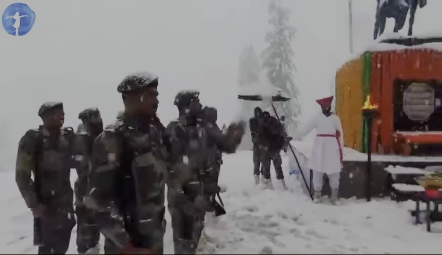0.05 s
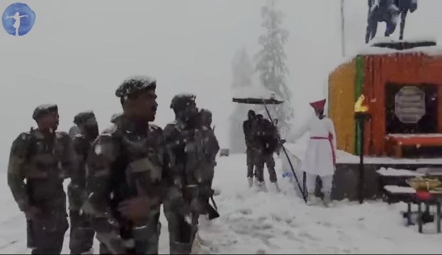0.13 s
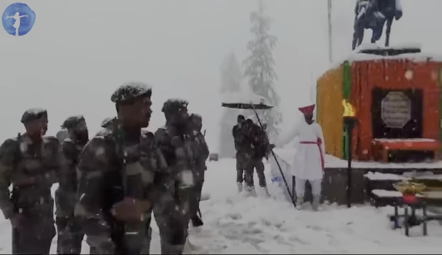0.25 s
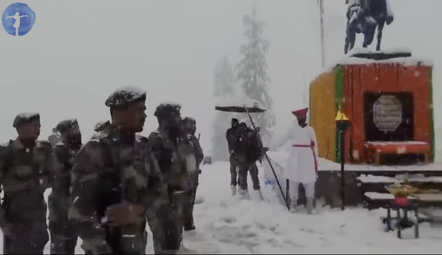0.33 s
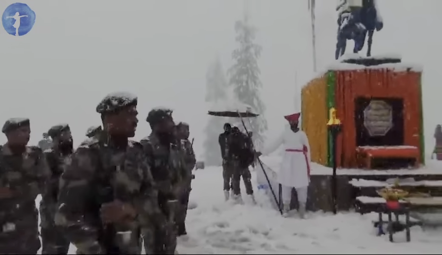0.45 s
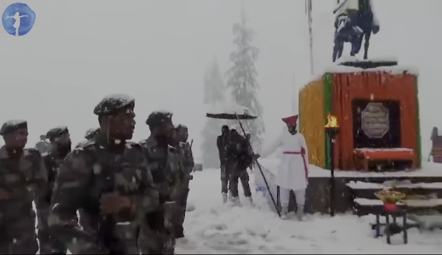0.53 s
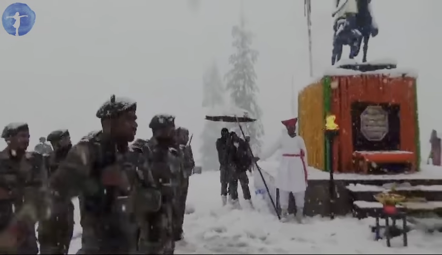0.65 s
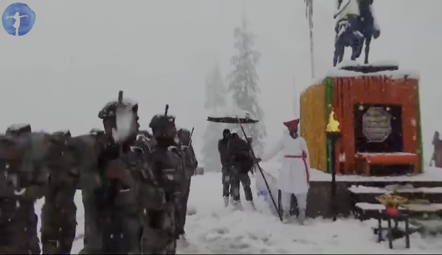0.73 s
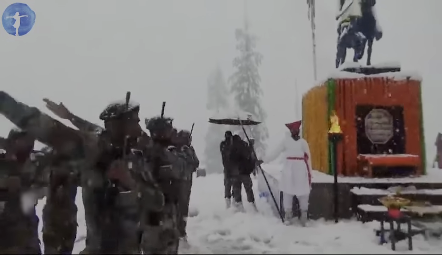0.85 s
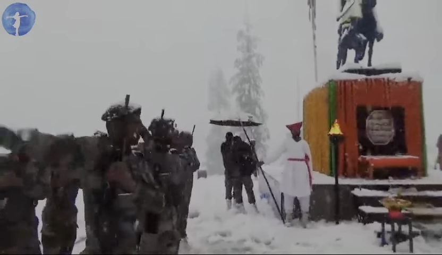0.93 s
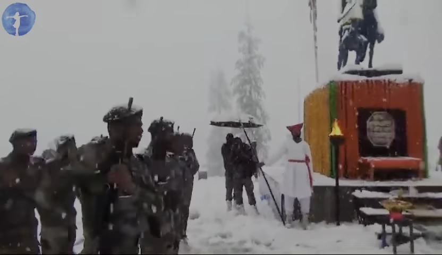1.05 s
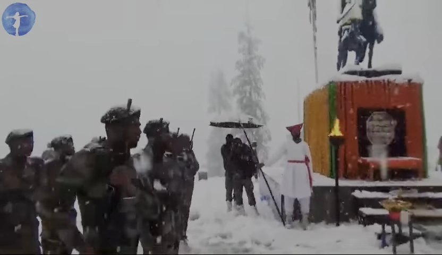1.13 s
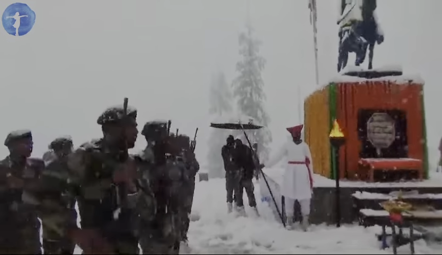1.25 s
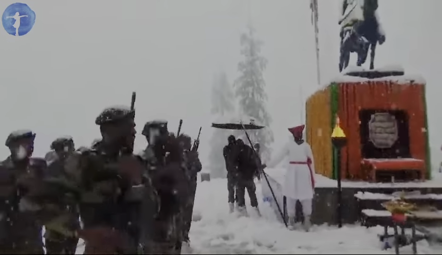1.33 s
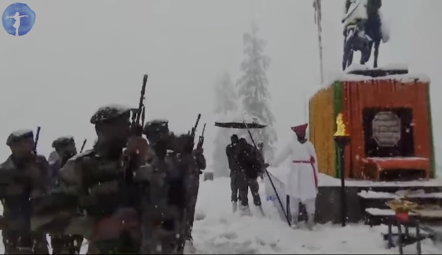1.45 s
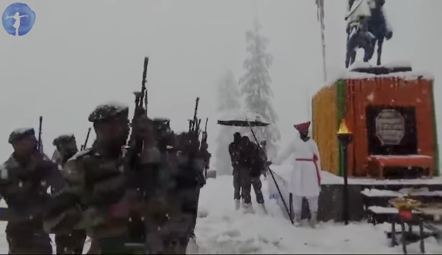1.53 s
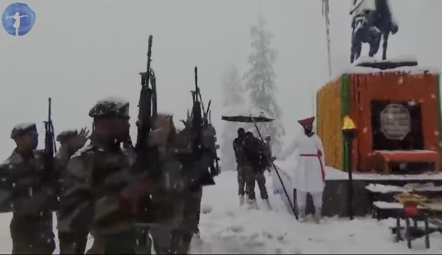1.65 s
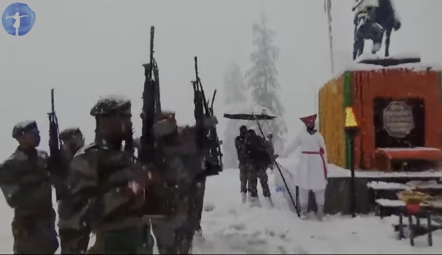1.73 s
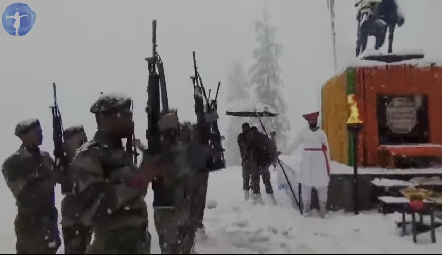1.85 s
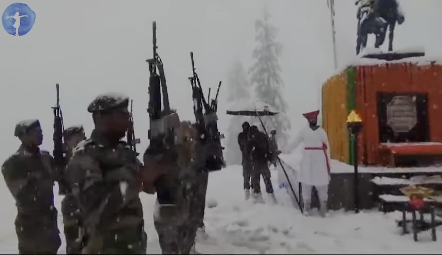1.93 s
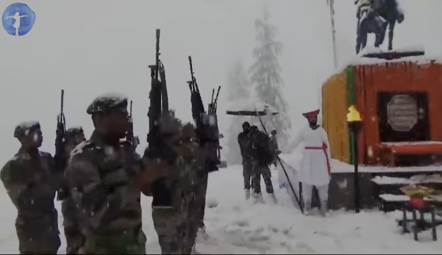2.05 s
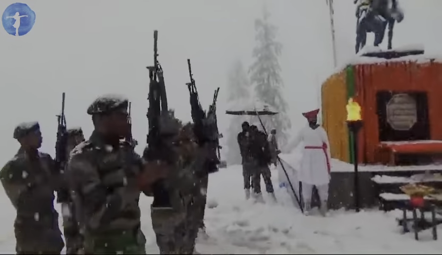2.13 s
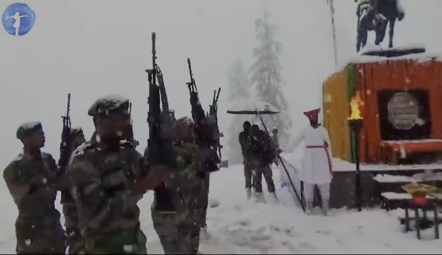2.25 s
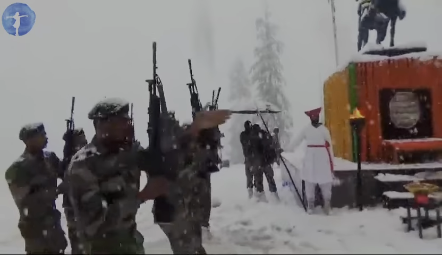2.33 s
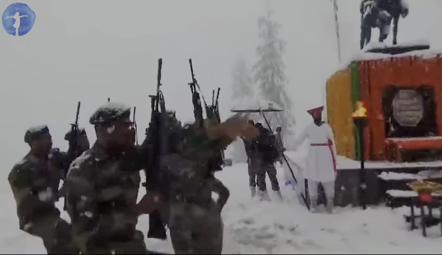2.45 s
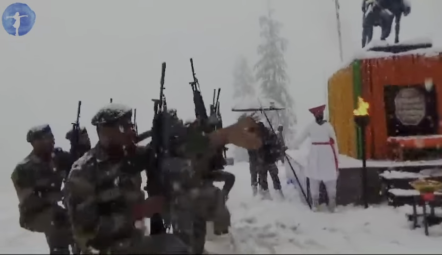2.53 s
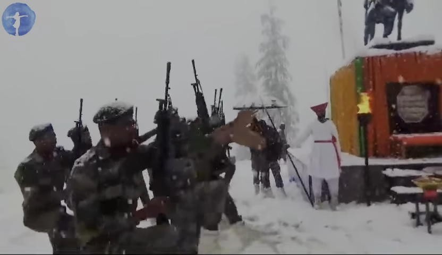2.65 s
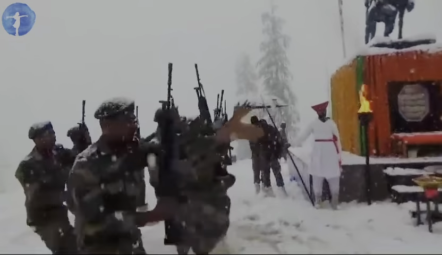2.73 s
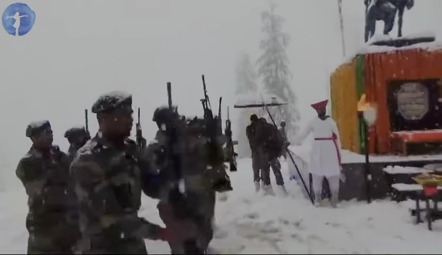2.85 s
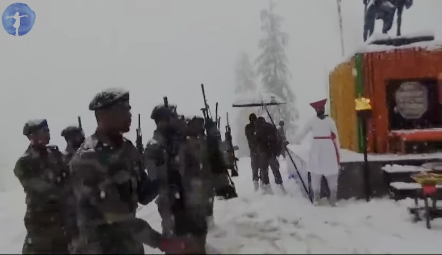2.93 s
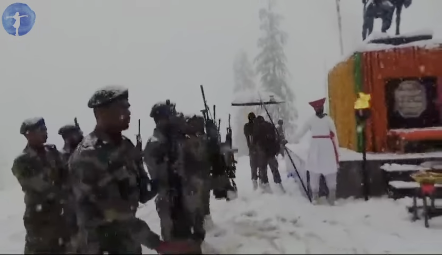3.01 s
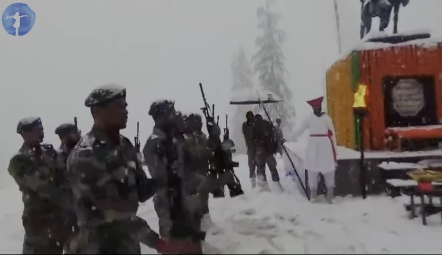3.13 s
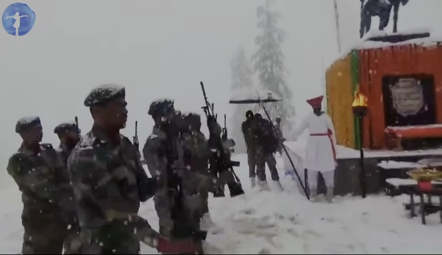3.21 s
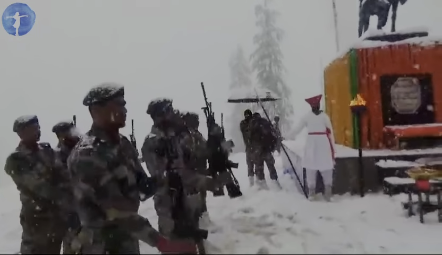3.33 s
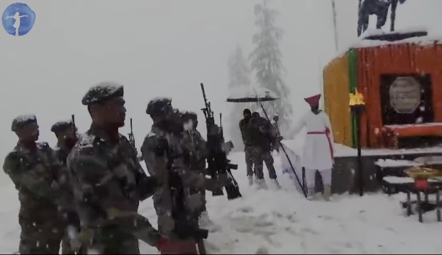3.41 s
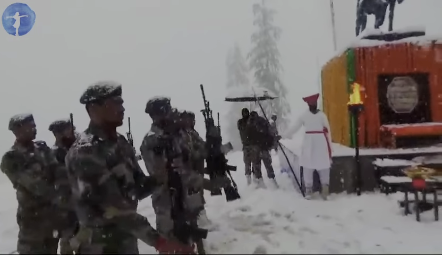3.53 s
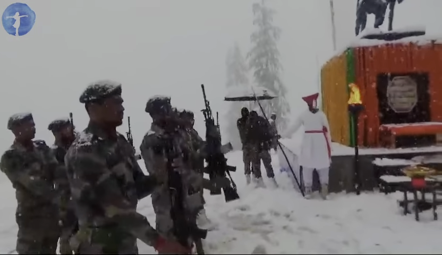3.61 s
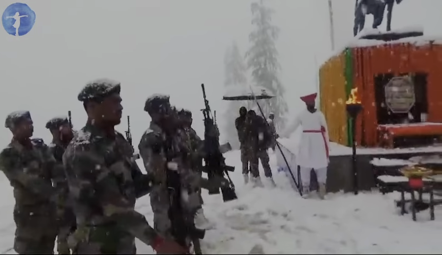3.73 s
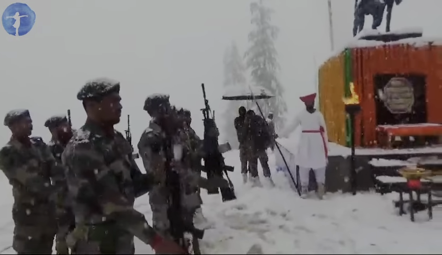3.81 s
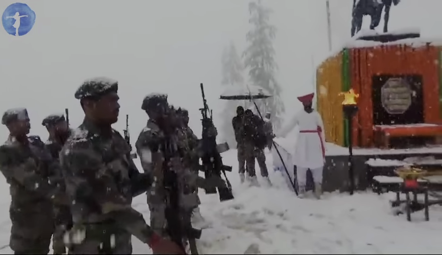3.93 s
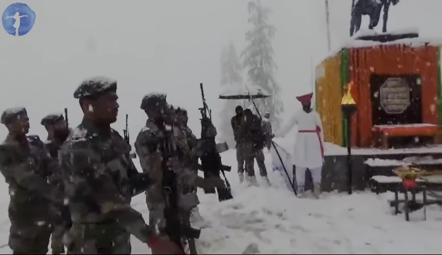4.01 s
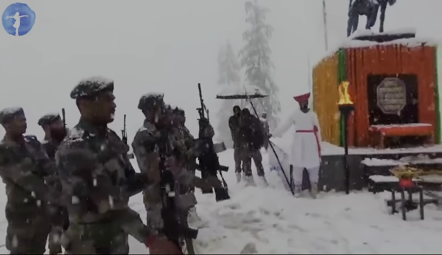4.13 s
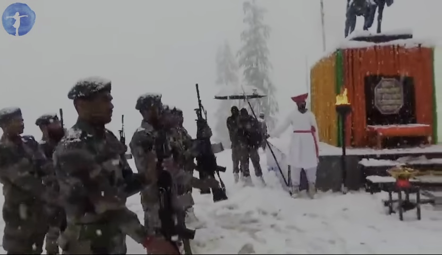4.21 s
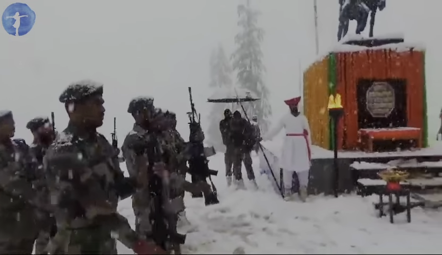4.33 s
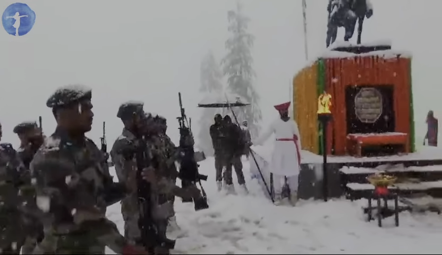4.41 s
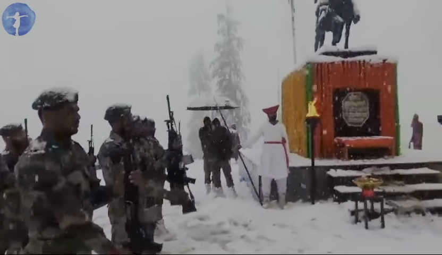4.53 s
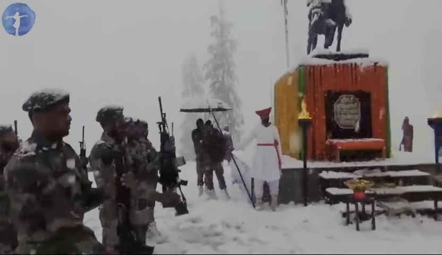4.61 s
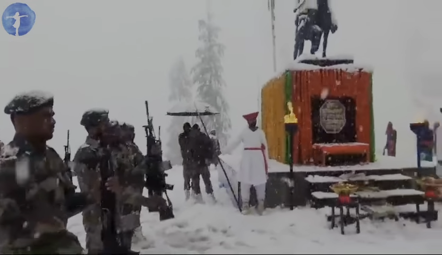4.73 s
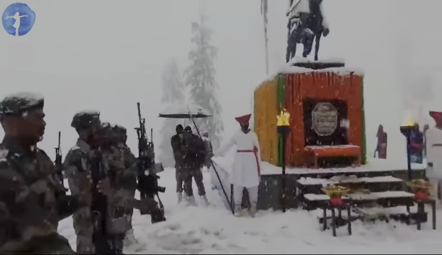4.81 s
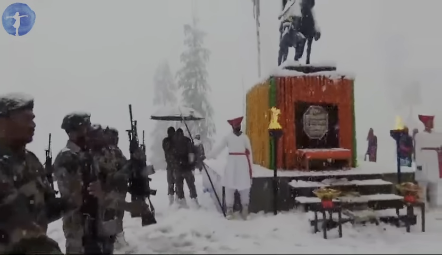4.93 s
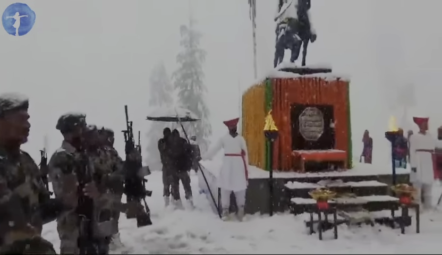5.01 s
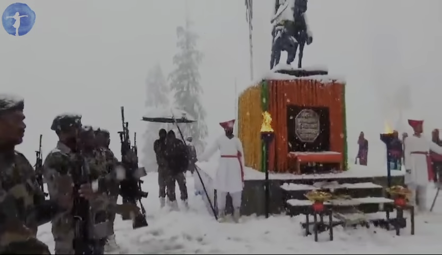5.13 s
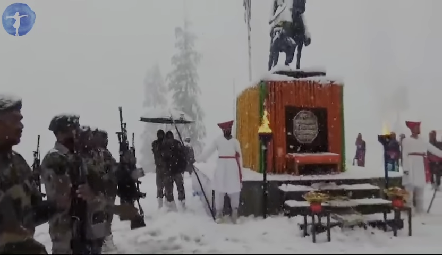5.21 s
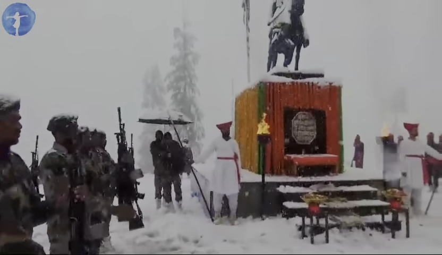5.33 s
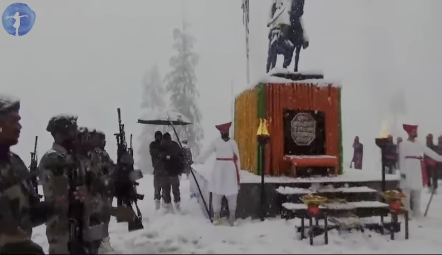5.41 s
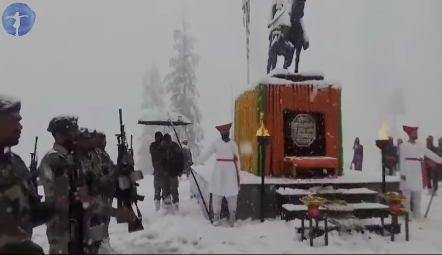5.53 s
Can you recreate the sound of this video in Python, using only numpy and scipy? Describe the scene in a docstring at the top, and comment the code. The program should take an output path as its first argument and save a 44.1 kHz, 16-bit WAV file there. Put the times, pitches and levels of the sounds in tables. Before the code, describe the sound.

A squad's rifle drill in the open air: clustered hand slaps, clinking fittings and body thumps, then faint rustling over a quiet hiss.

```python
"""Hands slap rifles and uniforms in four ragged volleys as a squad drills outdoors in snow.
Each impact is a pressure spike followed by a brief rattle, coloured by the rifle and by the air
under the palm; dull thumps weigh most in the last volley. Steel fittings clink and hollow rifle
parts ring in their natural modes, and cloth rustles by friction. A faint scattered echo and a
quiet open-air hiss surround the squad, a few metres from the microphone."""
import sys
import numpy as np
from scipy import signal
from scipy.fft import rfft, irfft, next_fast_len
from scipy.io import wavfile

SR = 44100
rng = np.random.default_rng(int(sys.argv[2]) if len(sys.argv) > 2 else 0)


def digitize_waveform(pressure):
    """Quantize a signal to 16-bit integers and store it at the path in sys.argv[1].

    Rows of a 2-D input are taken as channels; values are limited to [-1, 1].
    """
    field = np.atleast_2d(pressure).T
    bounded = np.clip(field, -1, 1)
    quanta = np.round(bounded * 32767).astype(np.int16)
    wavfile.write(sys.argv[1], SR, quanta)


N = 245627

# loudness of the open air: t/s, level/dB
AIR_LEVELS = [(0, -58.5), (1.0, -58.5), (2.6, -53.5), (3.2, -53), (3.7, -56), (5.57, -54)]
# spectral shapes of the air, its side signal, the echo, cloth, palm and slap: f/Hz, level/dB
AIR_SPECTRUM = [(15, -30), (25, -4), (69, 2), (92, -3.5), (218, -4.5), (296, -7), (635, -13), (685, -17),
                (1030, -12), (1670, -17.5), (2100, -21), (2390, -19), (5120, -23), (8100, -19.5),
                (11000, -26), (14300, -94), (22000, -120)]
AIR_SIDE_SPECTRUM = [(60, -31), (190, -18), (350, -13), (630, -4.5), (2000, -2.5), (6500, -6),
                     (11000, -10.5)]
ECHO_SPECTRUM = [(60, 1), (200, -1.5), (750, 3.5), (1500, -4.5), (3000, -2), (11000, -6)]
CLOTH_SPECTRUM = [(50, -7), (150, -6), (300, 4), (480, 0.5), (720, 0.5), (1100, 2.5), (1600, -0.5),
                  (2500, -2.5), (5000, -8.5), (8500, -6), (11000, -15)]
PALM_SPECTRUM = [(30, -56), (60, -36), (130, -12.5), (240, 7.5), (400, -1), (700, -17), (2000, -29)]
SLAP_SPECTRUM = [(50, -40), (100, -38), (300, -10), (480, -8.5), (680, -0.5), (900, -4.5), (2000, -3),
                 (3000, -3.5), (6000, -5), (9000, -2.5), (11000, -8)]
# movements of arms and slings: t/s, hold/s, rustle level/dB
MOVEMENTS = [(0.23,.12,-49.5), (0.59,.04,-46), (0.753,.04,-52.5), (1.172,.06,-37), (1.606,.08,-43),
             (1.794,.11,-46), (2.096,.09,-35), (2.336,.16,-38.5), (2.57,.24,-50.5), (2.917,0.037,-27),
             (3.047,.03,-45), (3.15,.38,-56), (4.11,.2,-61)]
# chance knocks of loose gear: rate/(1/s), level over the rustle/dB, f/Hz, scatter/octaves
FITTING_KNOCKS = (16, 3.6, 3600, 0.457)
HOLLOW_KNOCKS = (8.2, 14.5, 734, 0.14)
# natural modes of fittings and hollow parts: ratio to the lowest mode, level/dB, share of t60
STEEL_MODES = [(1, 0, 0.93), (1.15, -3, 0.42), (1.41, -9.5, 0.68), (1.72, -12, 0.63), (2.6, -8.5, 0.82),
               (2.72, -4, 0.47), (3.15, -32, 0.44)]
HOLLOW_PART_MODES = [(1, -3, 0.75), (1.09, -8.5, 0.88), (2.15, -19, 0.89)]
# sling swivels and catches meeting: t/s, level/dB, relative tick level/dB, lowest mode f/Hz
FITTING_HITS = [(.615,-48,-5,2430), (1.012,-36,-17,2980), (1.042,-39,4,2990), (1.106,-18,2,3500),
                (1.353,-28,-2,8080), (1.516,-32,-14,2920), (1.544,-20,3.5,3060), (1.547,-20.5,-1,2870),
                (1.678,-20.5,-25,2970), (1.715,-18,-25,2960), (1.731,-28.5,-18,3020), (1.803,-32,-20,3170),
                (1.924,-30.5,.5,8640), (2.319,-15.5,-12,4250), (2.34,-22.5,-6,2930), (2.592,-19,5,3010),
                (2.626,-30,-14,7160), (3.533,-49,17.5,2400), (4.14,-47,6.5,2350), (4.847,-44.5,15.5,3220),
                (5.109,-45.5,8.5,8000)]
# jolts that set a hollow rifle part ringing: t/s, level/dB, f/Hz, t60/s
HOLLOW_JOLTS = [(0.456,-19.5,1240,0.0095), (.928,-26,477,.02), (.980,-32,698,0.083),
                (1.207,-24.5,701.6,0.31), (1.222,-17,675,0.11), (1.561,-23,1110,0.028),
                (1.620,-26.5,693,0.086), (1.639,-26.5,1324,0.036), (1.795,-34,703,.13),
                (1.884,-28.5,1380,0.068), (2.445,-22,782,0.06), (2.496,-24,712,0.11), (2.777,-32,654,0.096)]
# arms and rifles landing on padded bodies: t/s, level/dB, f/Hz
BODY_BLOWS = [(.142,-13.5,442), (0.161,-31.5,172), (.930,-33,152), (1.114,-17,420), (1.153,-20.5,225),
              (2.155,-20,310), (2.316,-22,193), (2.438,-26,137), (2.491,-33,121), (2.887,-15.5,183),
              (2.909,-8.5,279), (2.933,-12.5,115), (2.966,-6.5,152), (2.988,-22.5,165), (3.005,-28,115)]
# resonances shared by the rifles: f/Hz, width/Hz, lift/dB
RIFLE_RESONANCES = [(680, 540, 7.5), (1094, 48, 4.5), (1580, 400, 3.5), (3170, 450, 0.5)]
# hands striking rifles and uniforms: t/s, relative level/dB, treble tilt/dB, t60/s
HAND_SLAPS = [(.121,-12.5,-28.5,0.076), (.14,-9.5,-19.5,0.12), (0.156,-5,-11,0.056),
              (0.181,-6.5,-16.5,0.078), (.216,-23,-24,0.088), (.254,-25,-18,0.04), (0.439,-33.5,-24,0.14),
              (.837,-29,-14,0.043), (1.098,-12.5,-19,0.051), (1.106,-17,-3.5,0.09), (1.112,-11,-9,0.084),
              (1.118,-7.5,-12,.12), (1.127,-12.5,-3.5,0.037), (1.145,-7,-14.5,0.09), (1.155,-10,-17,0.05),
              (1.164,-10.5,-9,0.05), (1.176,-12,-19,0.034), (1.202,-9,-17.5,.12), (1.546,-17.5,-12.5,0.053),
              (1.606,-24.5,-24,0.071), (1.851,-12,-19,0.027), (1.883,-23.5,-23,0.056), (2.0405,-13,-1,0.17),
              (2.059,-5,-14,0.17), (2.076,-4.5,-20.5,0.094), (2.100,-4,-16.5,0.16), (2.1195,-3,-12,.07),
              (2.139,-9.5,-17.5,0.11), (2.150,-8.5,-17.5,0.12), (2.173,-15,-7,0.027), (2.308,-27,-7,0.046),
              (2.317,-14.5,-4.5,0.026), (2.4445,-8.5,-24,.06), (2.495,-20,-21.5,.025),
              (2.523,-18,-21,0.069), (2.8555,-3,-27.5,0.058), (2.887,-8.5,-23.5,.08), (2.899,-7,-14,0.11),
              (2.912,-5.5,-14.5,0.06), (2.936,-4.5,-21,0.019), (2.968,-6.5,-19.5,0.026),
              (2.981,-20,-27,0.095), (3.138,-33,-13,0.066)]


def undb(db):
    """Amplitude ratio of a level in decibels."""
    return 10 ** (np.asarray(db) / 20)


def unit(x):
    """Normalisation to an rms of 1."""
    return x / np.sqrt(np.mean(x ** 2))


def colour(x, spectrum, resonances=()):
    """Minimum-phase filter of unit power gain: a spectral shape with resonance peaks on top."""
    size = next_fast_len(x.shape[-1] // 2 + 1, True) * 2
    hz = np.maximum(np.fft.rfftfreq(size, 1 / SR), 1)
    point_hz, point_db = np.transpose(spectrum)
    db = np.interp(np.log(hz), np.log(point_hz), point_db)
    for centre, width, lift in resonances:
        db = db + lift / (1 + (2 * (hz - centre) / width) ** 2)
    # folding the cepstrum onto positive time makes the filter causal
    cepstrum = irfft(np.log(unit(undb(db))))
    cepstrum[1:size // 2] *= 2
    cepstrum[size // 2 + 1:] = 0
    return irfft(rfft(x, size) * np.exp(rfft(cepstrum)))[..., :x.shape[-1]]


def fade(t, t60):
    """Exponential damping, 60 dB down after t60 seconds."""
    return np.exp(-np.log(1000) * t / t60)


def rise(t, rise_s):
    """Exponential build-up with time constant rise_s."""
    return 1 - np.exp(-t / rise_s)


def stereo(pair, side_db):
    """Left and right as the sum and difference of a mid and a side signal."""
    return pair[0] + undb(side_db) * pair[1] * np.array([[1], [-1]])


def add(out, start_s, sound):
    """Superposition of a sound on the mix from start_s on."""
    start = max(int(start_s * SR), 0)
    out[:, start:start + sound.shape[-1]] += sound[..., :N - start]


def wander(rate_hz):
    """Random modulation: Gaussian values joined by straight lines."""
    return np.interp(np.arange(N) / SR * rate_hz, np.arange(N // 10), rng.standard_normal(N // 10))


def ring(modes, t, hz, t60, detune):
    """Free vibration as a sum of damped modes, in mid and side; each part is tuned a little apart."""
    out = 0
    for ratio, db, share in modes:
        mode_hz = hz * ratio * (1 + detune * rng.standard_normal())
        cycles = mode_hz * t + rng.random((2, 1))
        out = out + (mode_hz < SR / 2) * undb(db) * fade(t, t60 * share) * np.sin(2 * np.pi * cycles)
    return out


def open_air():
    """Ambient noise: a rumble nearly alike in both channels and a less coherent, wider hiss."""
    mid, side = colour(rng.standard_normal((2, N)), AIR_SPECTRUM)
    noise = stereo([mid, colour(side, AIR_SIDE_SPECTRUM)], side_db=-7)
    level_db = np.interp(np.arange(N) / SR, *np.transpose(AIR_LEVELS))
    return unit(noise) * undb(level_db)


def echo(direct, t60=0.43, wet_db=-21):
    """Absorption and scattering: snow takes most of the sound, people and stonework return a dull tail."""
    t = np.arange(SR * 3 // 4) / SR
    scatter = rng.standard_normal((2, len(t))) * fade(t, t60) * rise(t, 0.005)
    tail = stereo(colour(scatter, ECHO_SPECTRUM), side_db=-6)
    response = unit(tail) / np.sqrt(len(t))
    return undb(wet_db) * signal.fftconvolve(direct.mean(axis=0)[None], response, axes=1)[:, :N]


def movement_level(swell_db_per_s=240, settle_db_per_s=176, still_db=-61):
    """Excitation level in dB: each movement grows, holds and decays exponentially over a faint stir."""
    t = np.arange(N) / SR
    levels = [db - swell_db_per_s * np.maximum(start - t, 0)
              - settle_db_per_s * np.maximum(t - start - hold, 0) for start, hold, db in MOVEMENTS]
    return 20 * np.log10(np.hypot(undb(np.max(levels, axis=0)), undb(still_db)))


def cloth_rustle(movement_db, crinkle_db=5, fold_db=2):
    """Friction noise: stiff cloth rubs in folds and crinkles and faintly excites the hollow rifle parts."""
    grain = unit(undb(crinkle_db * wander(rate_hz=310) + fold_db * wander(rate_hz=60)))
    friction = rng.standard_normal((2, N)) * grain * undb(movement_db)
    hollow_resonance = (700, 150, 7)  # f/Hz, width/Hz, lift/dB
    return stereo(colour(friction, CLOTH_SPECTRUM, [hollow_resonance]), side_db=-10)


def loose_knocks(movement_db, rate, over_db, hz, octaves, scatter_db=2.5, limit_db=-32.5):
    """Random collisions of loose gear, harder as its wearer moves: rows of t/s, level/dB, f/Hz."""
    time_jitter, level_jitter, pitch_jitter = rng.uniform(-1, 1, (N // 2000, 3)).T
    times = (np.arange(len(time_jitter)) + 1 + time_jitter) / rate
    levels = np.interp(times * SR, np.arange(N), movement_db) + over_db + scatter_db * level_jitter
    rows = zip(times, np.minimum(levels, limit_db), hz * 2 ** (octaves * pitch_jitter))
    return [row for row in rows if row[0] < N / SR]


def fitting_clinks(movement_db, ring_db=-6, contact_db=-3, loose_tick_db=5):
    """Hard contact: small steel fittings give a bright tick and ring briefly in inharmonic modes."""
    out, t = np.zeros((2, N)), np.arange(SR // 7) / SR
    highpass = signal.butter(1, 2500, "high", fs=SR, output="sos")
    loose = [(start, db, loose_tick_db, hz)
             for start, db, hz in loose_knocks(movement_db, *FITTING_KNOCKS)]
    for start, db, tick_db, hz in FITTING_HITS + loose:
        tick = signal.sosfilt(highpass, rng.standard_normal((2, len(t))) * fade(t, t60=0.01))
        ringing = ring(STEEL_MODES, t, hz, t60=0.026, detune=0.023)
        clink = undb(ring_db) * ringing + undb(contact_db + tick_db) * tick
        add(out, start, undb(db) * stereo(clink, side_db=-9))
    return out


def hollow_rings(movement_db, jolt_db=-20, jolt_hz=728.4, jolt_octaves=0.12,
                 jolt_t60=0.054, loose_t60=0.04):
    """Resonance: hollow rifle parts give a short, nearly pure tock when jolted, slapped or shaken."""
    out, t = np.zeros((2, N)), np.arange(SR // 5) / SR
    # the level follows the blow; the pitch differs from rifle to rifle
    slapped = [(start, jolt_db + 0.5 * db, jolt_hz * 2 ** (jolt_octaves * rng.standard_normal()), jolt_t60)
               for start, db, _, _ in HAND_SLAPS]
    loose = [(start, db, hz, loose_t60) for start, db, hz in loose_knocks(movement_db, *HOLLOW_KNOCKS)]
    for start, db, hz, t60 in HOLLOW_JOLTS + slapped + loose:
        tock = ring(HOLLOW_PART_MODES, t, hz, t60, detune=0.016) * rise(t, 0.00059)
        add(out, start, undb(db) * stereo(tock, side_db=-14))
    return out


def body_thumps(padding_db=-8, low_cut_hz=80):
    """Heavily damped oscillation: a soft blow rocks the body for a few cycles as the padding crumples."""
    out, t = np.zeros((2, N)), np.arange(SR // 5) / SR
    envelope = rise(t, 0.00083) * fade(t, t60=0.039)
    for start, db, hz in BODY_BLOWS:
        padding = stereo(colour(rng.standard_normal((2, len(t))), PALM_SPECTRUM), side_db=-3)
        thump = np.sin(2 * np.pi * hz * t) + undb(padding_db) * padding
        add(out, start, undb(db) * thump * envelope)
    # a body is too small to radiate the deepest bass
    return signal.sosfilt(signal.butter(2, low_cut_hz, "high", fs=SR, output="sos"), out)


def hand_slaps(gain_db=-8, palm_db=-20, crack_db=4, spike_db=16, hardening=0.6, rattle_db=2,
               split_hz=3000, treble_t60_share=0.92, neutral_tilt_db=-13,
               cup_hz=1000, cup_q=3.2, cup_db=5, tilt_db_per_octave=14, cup_scatter_octaves=0.26):
    """Impact excitation: each hand cracks on contact and the rifle chatters over the thud of the palm."""
    out, t = np.zeros((2, N)), np.arange(SR // 7) / SR
    lowpass = signal.butter(2, split_hz, fs=SR, output="sos")
    highpass = signal.butter(1, split_hz, "high", fs=SR, output="sos")
    for start, db, tilt_db, t60 in HAND_SLAPS:
        contact_noise, palm_noise = rng.standard_normal((2, 2, len(t)))
        # skin squeezes out a spurt of air; the harder the blow, the more its pressure spike stands out
        crack = undb(crack_db) * contact_noise * fade(t, t60=0.00056)
        crack[0, 0] += undb(spike_db + hardening * db)
        # loose parts knock about once a millisecond, each time with a different force
        force_db = rattle_db * np.repeat(rng.standard_normal(len(t)), SR // 1000)[:len(t)]
        chatter = contact_noise * unit(undb(force_db))
        low = signal.sosfilt(lowpass, crack + chatter * fade(t, t60))
        high = signal.sosfilt(highpass, crack + chatter * fade(t, t60 * treble_t60_share))
        # the air cupped under the hand resonates; the duller the slap, the higher this pop
        treble_db = tilt_db - neutral_tilt_db
        octaves = cup_scatter_octaves * rng.standard_normal() - treble_db / tilt_db_per_octave
        pop_hz = cup_hz * 2 ** octaves
        resonances = [*RIFLE_RESONANCES, (pop_hz, pop_hz / cup_q, cup_db)]
        hit = colour(low - undb(treble_db) * high, SLAP_SPECTRUM, resonances)
        thud = undb(palm_db) * colour(palm_noise * fade(t, t60=0.042), PALM_SPECTRUM)
        add(out, start, undb(db + gain_db) * (stereo(hit, side_db=-14) + stereo(thud, side_db=-7)))
    return out


def scene():
    """Superposition of the open air, the squad's direct sound and its faint echo."""
    air, movement_db = open_air(), movement_level()
    impacts = hand_slaps() + body_thumps()
    squad = impacts + cloth_rustle(movement_db) + fitting_clinks(movement_db) + hollow_rings(movement_db)
    return air + squad + echo(squad)


def record(dry, ceiling=0.55, top_hz=11050):
    """Saturation and band limiting: the microphone rounds the loudest peaks and cuts the top."""
    lowpass = signal.ellip(10, 0.2, 70, top_hz, fs=SR, output="sos")
    return signal.sosfilt(lowpass, ceiling * np.tanh(dry / ceiling))


dry = scene()
out = record(dry)
digitize_waveform(out)
```